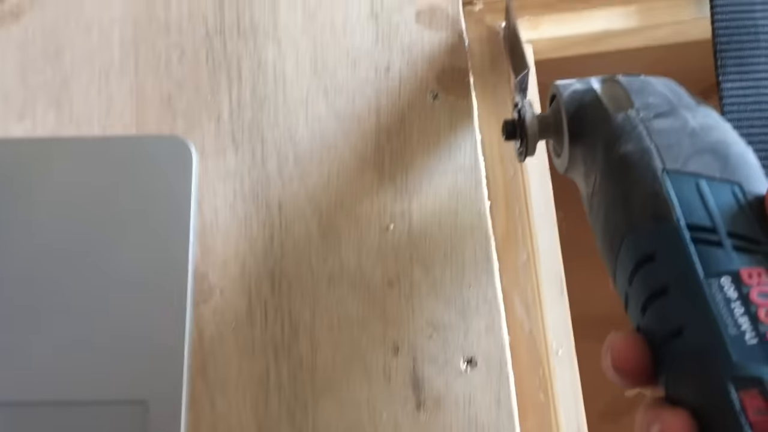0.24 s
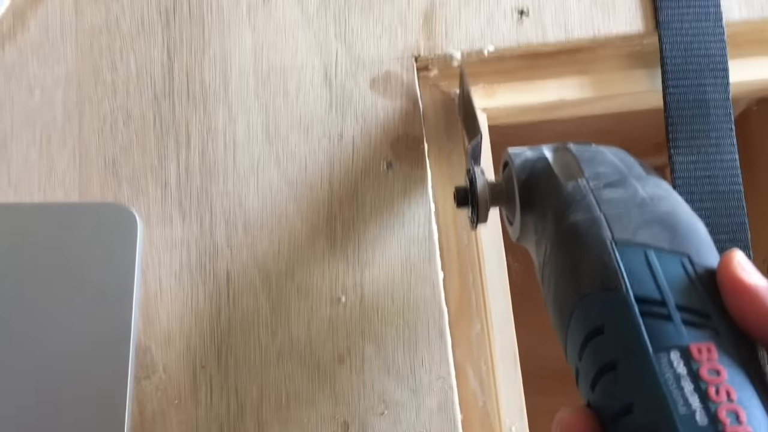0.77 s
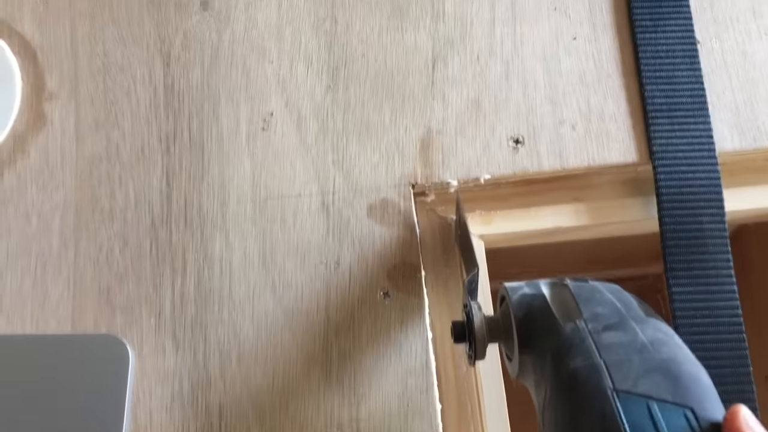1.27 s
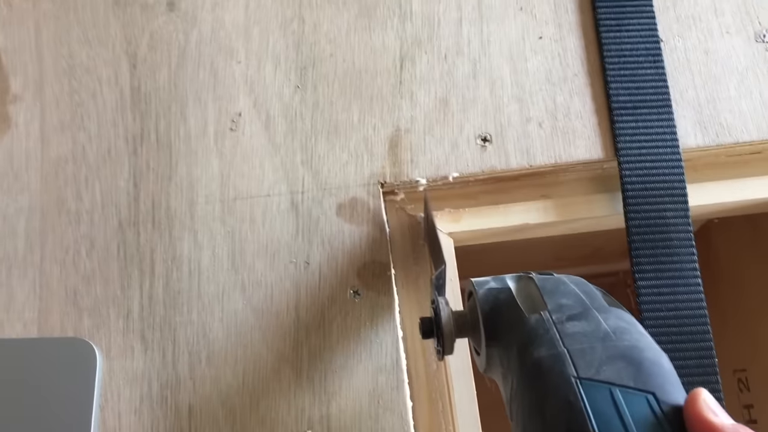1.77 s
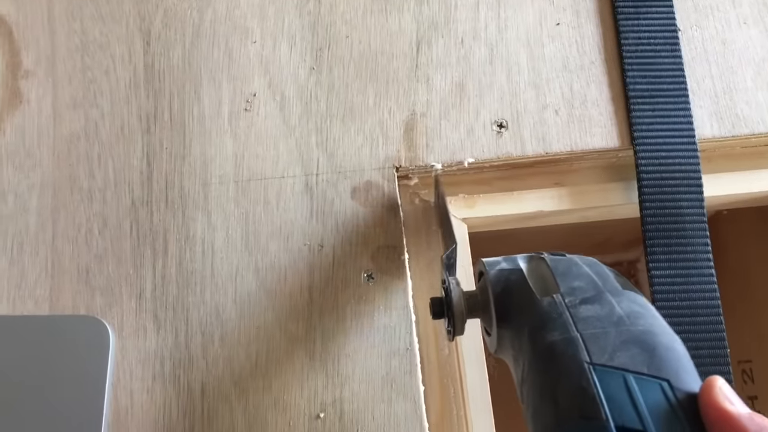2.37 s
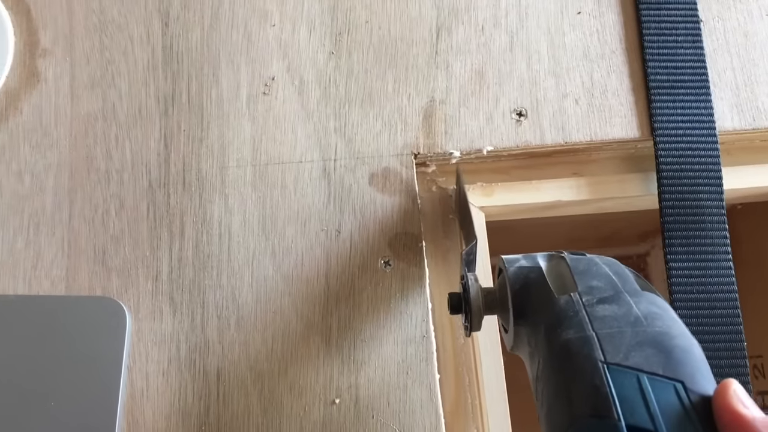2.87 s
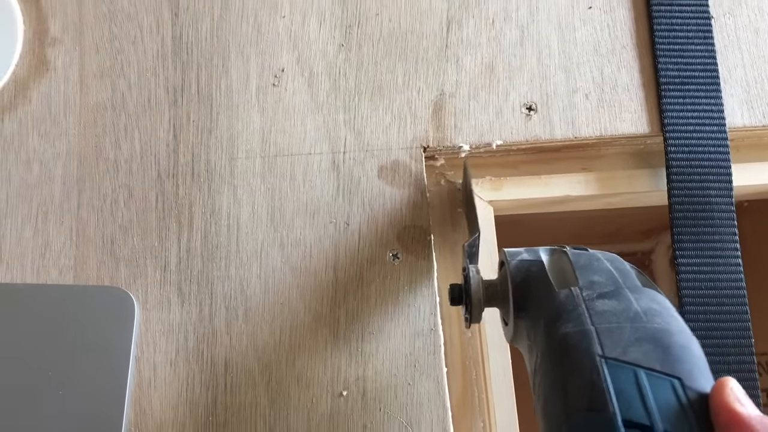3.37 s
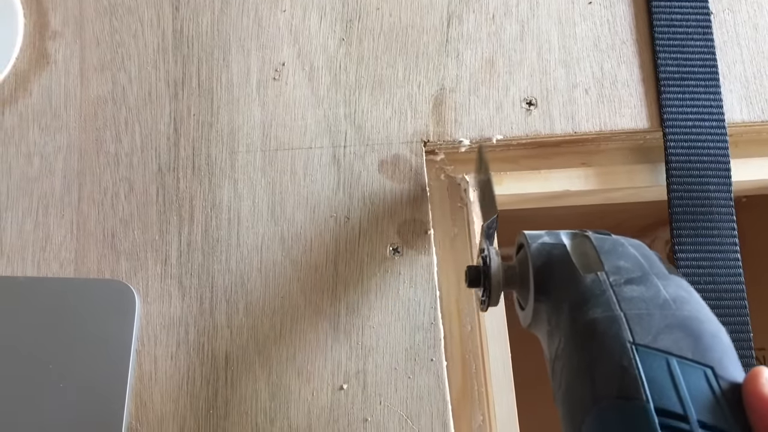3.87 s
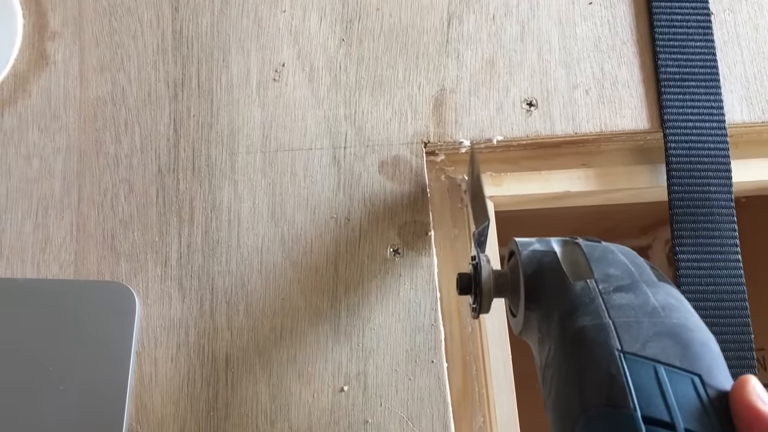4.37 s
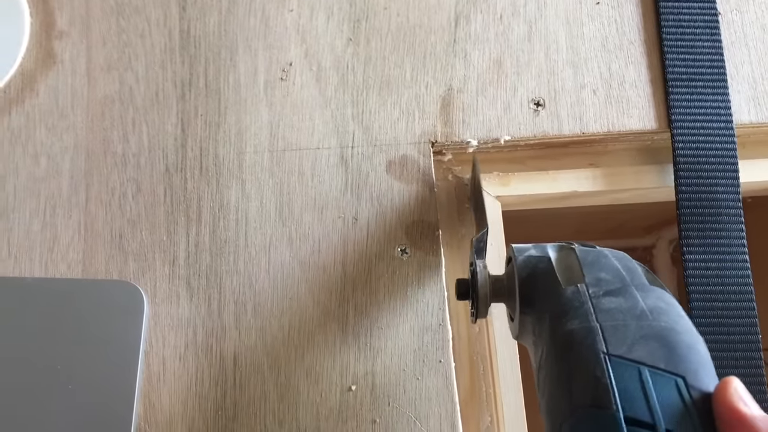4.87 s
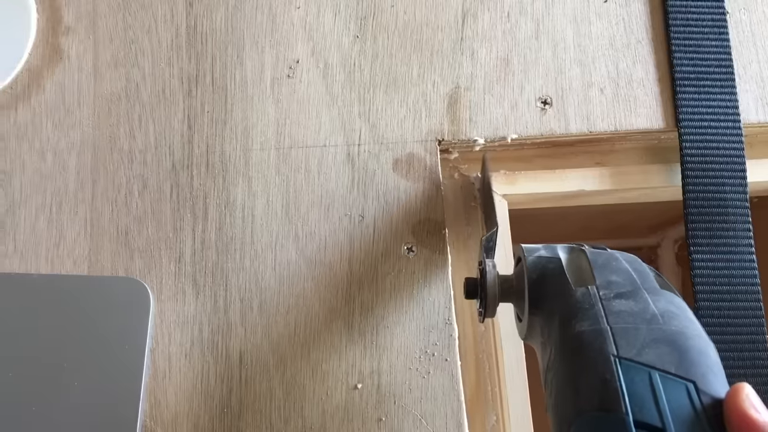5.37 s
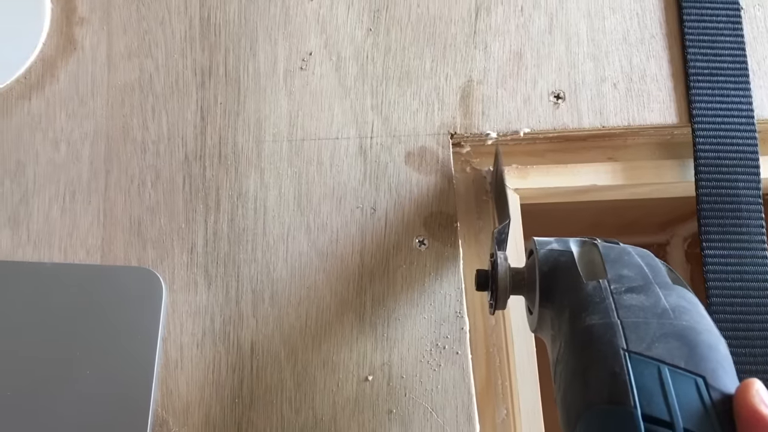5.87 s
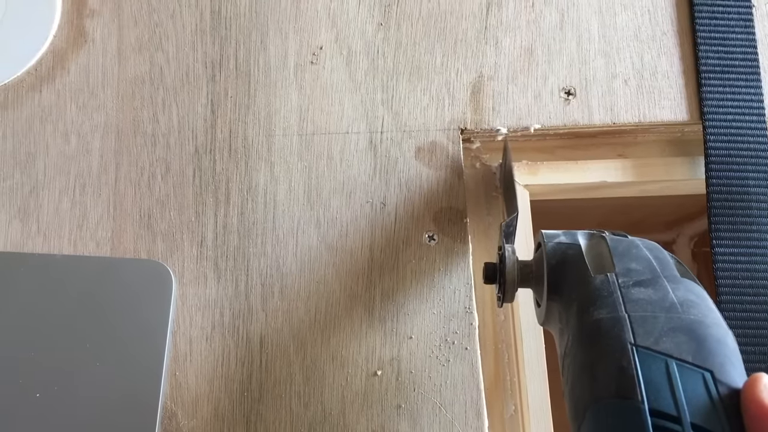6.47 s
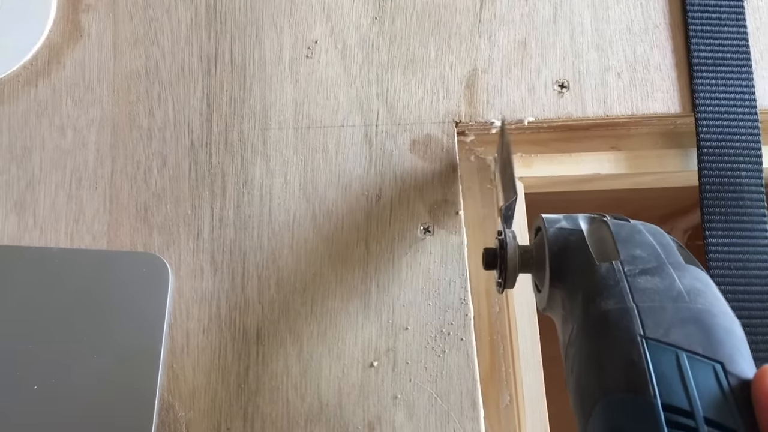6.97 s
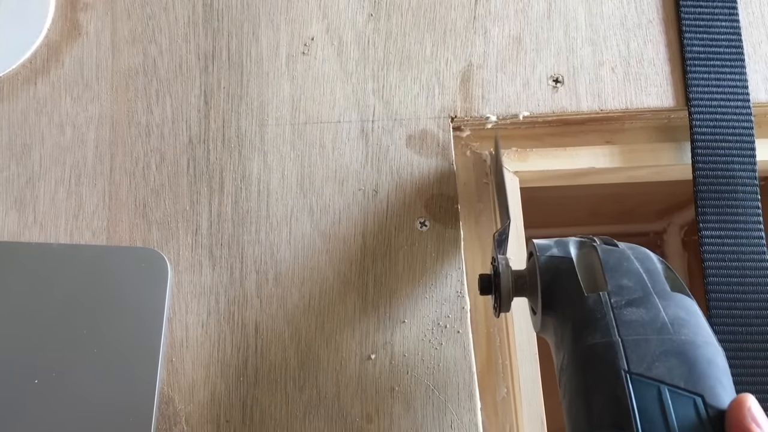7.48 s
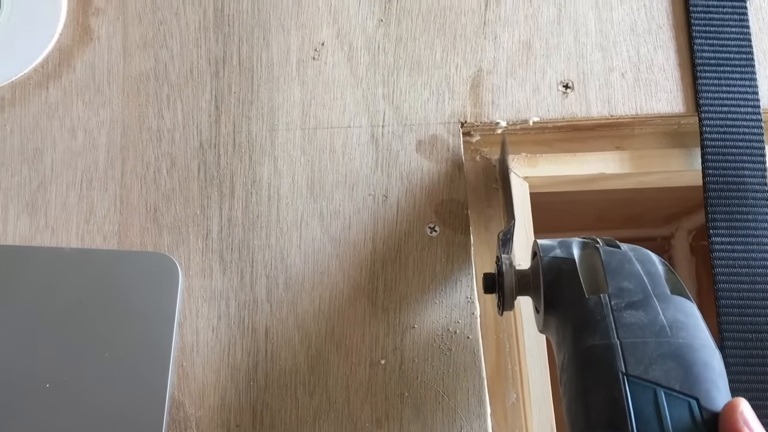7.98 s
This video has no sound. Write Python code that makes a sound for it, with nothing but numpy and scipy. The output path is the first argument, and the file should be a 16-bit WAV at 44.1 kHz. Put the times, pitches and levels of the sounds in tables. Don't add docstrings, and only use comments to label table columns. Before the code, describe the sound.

Continuous loud, nasal power-tool buzz near 285 strokes a second, with gritty wood rasp, thin metallic whine and rough knocking as the blade bounces.

```python
import sys
import numpy as np
from scipy import signal
from scipy.fft import rfft, irfft, next_fast_len
from scipy.io import wavfile
from scipy.ndimage import uniform_filter1d

SR = 44100
rng = np.random.default_rng(int(sys.argv[2]) if len(sys.argv) > 2 else 0)


def inscribe(sig):
    pcm = np.round(np.clip(np.atleast_2d(sig).T, -1, 1) * 32767)
    wavfile.write(sys.argv[1], SR, pcm.astype(np.int16))


def gain_from_decibels(decibels):
    exponent = np.asarray(decibels, float) / 20
    return 10 ** exponent


N = 363384
TIME = np.arange(N) / SR

# start t/s, end t/s, level/dB, share locked to every second stroke [0-1]
BOUNCES = [(.07, .18, -36.5, 1), (1.95, 2.3, -38, 0), (2.365, 2.385, -33, .7), (2.475, 2.562, -34.5, 1),
           (2.578, 2.598, -33, .7), (2.725, 2.795, -32.5, .75), (2.795, 2.808, -40, .75),
           (2.808, 2.84, -32.5, .75), (2.94, 2.97, -36, .3), (2.99, 3.03, -35.5, .3),
           (3.22, 3.37, -38.5, .5), (3.44, 3.49, -34, .7), (3.53, 3.56, -35, .8), (3.58, 3.62, -35, .8),
           (3.655, 3.697, -33.5, .9), (3.712, 3.762, -34, .85), (3.785, 3.828, -33.5, .8),
           (3.845, 3.887, -34, .85), (3.983, 4.0, -34, .6), (4.012, 4.09, -34, 1), (4.09, 4.168, -35.5, 1),
           (4.445, 4.475, -32.5, 1), (4.475, 4.51, -35, .8), (4.55, 4.62, -34.5, 1),
           (4.62, 4.655, -34.5, .5), (4.69, 4.73, -36, .3), (4.79, 4.86, -34.5, .3),
           (4.872, 4.928, -33.5, .8), (4.928, 4.972, -34, .2), (5.005, 5.022, -35.5, .2),
           (5.033, 5.047, -33.5, .2), (5.055, 5.095, -36.5, .2), (5.095, 5.36, -40.5, 0),
           (5.38, 5.43, -35, .2), (5.47, 5.6, -37, .2), (6.9, 6.935, -36, .3), (6.935, 7.0, -32.5, .75),
           (7.0, 7.035, -35, .6), (7.035, 7.07, -38, 0), (7.555, 7.635, -34.5, .3), (7.635, 7.8, -38, 0),
           (7.8, 7.96, -36.5, .2), (7.96, 8.06, -39, 0), (8.08, 8.17, -34, 0)]


def curves(table):
    s, *columns = np.transpose(table)
    return [np.interp(TIME, s, c) for c in columns]


def spells(table, column=2, rest=0., size=300):
    out = np.full(N, 1. * rest)
    for row in table:
        out[int(row[0] * SR):int(row[1] * SR)] = row[column]
    return uniform_filter1d(out, size=size)


def unit(x):
    return x / np.sqrt(np.mean(x ** 2))


def walk(rate):
    knots = uniform_filter1d(rng.standard_normal(int(rate * 25) + 3), size=3) * np.sqrt(3)
    return np.interp(TIME, np.arange(len(knots)) / (3 * rate), knots)


def ring(x, modes):
    total = 0
    for hz, width, db in modes:
        total = total + gain_from_decibels(db) * signal.lfilter(*signal.iirpeak(hz, hz / width, SR), x)
    return unit(total)


def gate(phase, sharp, lag=0.):
    return np.exp(sharp * (np.cos(2 * np.pi * (phase - lag)) - 1))


def shoves_db():
    shoves = [(0.027, 0.04, -6), (0.277, 0.17, -1.5), (0.484, 0.08, 3.5), (0.568, 0.029, 2),
              (0.63, 0.037, -1.5), (0.665, 0.012, 2.5), (1.407, 0.056, -1.5), (7.35, .06, -1),
              (8.131, 0.054, -0.5), (4.991, 0.023, -3), (6.94, 0.035, 1.5), (0.781, 0.098, 4.5),
              (1.11, 0.15, 1.03), (1.603, 0.27, -1), (1.995, 0.11, 3), (2.373, 0.12, -2.5),
              (2.865, 0.033, -3), (3.289, 0.12, 4), (3.632, 0.031, -2.5), (3.705, .016, -4),
              (3.771, 0.018, -4), (3.834, .018, -4), (3.905, .03, -2.5), (4.007, .014, -3),
              (1.82, .06, -1.5), (5.024, .012, -3), (6.62, .06, -1.5), (3.932, 0.059, -2),
              (4.164, 0.017, 5), (4.238, 0.082, -3), (4.465, 0.032, 3.5), (4.527, 0.022, -2.5),
              (4.727, 0.057, -1), (4.938, 0.026, 7), (4.971, 0.013, 3.5), (5.156, 0.043, -4),
              (5.392, 0.035, 2.5), (5.44, 0.03, -3), (6.699, 0.074, -3), (7.006, 0.039, 4),
              (7.11, 0.092, -2.5), (7.446, 0.14, 2), (7.591, 0.052, 1.5), (7.988, 0.03, -1.5),
              (8.201, 0.042, -2)]
    return sum(db * np.exp(-(2 * (TIME - s) / length) ** 2 / 2) for s, length, db in shoves)


def stroke_hz(locked):
    # t/s, stroke rate f/Hz
    speed = [(0, 283.8), (.3, 285.6), (.95, 280.8), (1.45, 285), (2.3, 282.6), (2.68, 289.2), (2.95, 282.8),
             (3.3, 280.9), (3.46, 287), (4.3, 286.9), (4.7, 283.8), (5.35, 285.3), (6.0, 277.5),
             (6.85, 279.2), (7.2, 289), (7.53, 288.2), (7.65, 282.3), (8.24, 280.7)]
    recover_s, brake_hz, brake_hz_per_db = .04, 5.5, .25
    keep = np.exp(-1 / (recover_s * SR))
    load_hz = brake_hz * locked + brake_hz_per_db * shoves_db()
    return curves(speed)[0] - signal.lfilter([1 - keep], [1, -keep], load_hz) + .45 * walk(9.)


def wobble(repeat):
    sways = [
        (.3, .9, .1),
        (1.5, 2.4, .24),
        (5.33, 5.95, .27),
        (6.75, 6.92, .25),
        (7.78, 8.3, .22),
    ]
    depth = spells(sways, rest=.06, size=4000) * np.minimum(2.5 - 2.5 * repeat, 1.2)
    wobble_hz = 36.77 + 4 * walk(5.)
    return depth * np.exp(2j * np.pi * np.cumsum(wobble_hz) / SR)


def hum(phase, hum_db, locked, repeat, sway):
    level_db = hum_db - 2.5 * locked + 3.6 * (1 - repeat) * walk(14.)
    return np.sqrt(2) * np.cos(2 * np.pi * phase) * (1 + .6 * sway.real) * gain_from_decibels(level_db)


def favour(multiple):
    # start t/s, end t/s, multiple of the stroke rate, level/dB
    favoured = [(.36, 1.2, 12, 7), (.66, 1.45, 11, 4), (.5, 1.3, 15, 8), (.66, 1.45, 10, -4),
                (1.0, 1.3, 9, 3), (1.3, 1.5, 5, -7), (1.9, 2.1, 5, -4), (1.95, 2.3, 7, -5),
                (2.62, 2.7, 12, 6), (3.22, 3.37, 5, 4), (3.22, 3.37, 6, -8), (3.22, 3.32, 8, 8),
                (1.9, 2.3, 12, 5), (3.2, 3.45, 12, 6), (2.62, 2.7, 13, 5), (4.33, 4.41, 13, 7),
                (4.33, 4.41, 20, 8), (4.33, 4.41, 11, -4), (5.25, 5.4, 9, -9), (5.25, 5.4, 6, -5),
                (5.25, 5.4, 7, -4), (5.62, 5.78, 9, 3), (5.62, 5.78, 6, -6), (5.93, 6.09, 6, 5),
                (5.99, 6.09, 8, 7), (6.0, 6.1, 7, -3), (7.08, 7.36, 6, 3), (6.1, 6.2, 5, -7),
                (6.1, 6.2, 6, -4), (6.33, 6.6, 13, -6), (6.33, 6.6, 16, -6), (6.35, 6.56, 6, 3),
                (6.3, 6.5, 3, 5), (6.5, 6.8, 5, -4), (6.12, 6.6, 7, 3), (6.34, 6.47, 9, -10),
                (6.3, 6.6, 20, -6), (6.62, 6.78, 14, 7), (6.62, 6.78, 12, 6), (6.78, 6.92, 6, 6),
                (6.9, 7.05, 7, -6), (6.9, 7.05, 5, 4), (7.06, 7.16, 7, 3), (7.15, 7.25, 8, -10),
                (7.15, 7.25, 12, -10), (7.15, 7.25, 11, 4), (7.15, 7.25, 14, 7), (7.15, 7.25, 15, 6),
                (7.55, 7.65, 6, 6), (7.55, 7.8, 7, -5)]
    # start t/s, end t/s, level/dB
    whistles = [(0, .07, 10), (.07, .18, 1.5), (.18, .36, 5.5), (.36, .47, 4), (.47, .66, 2.5),
                (2.3, 2.47, 4), (2.6, 2.72, 3.5), (3.0, 3.22, 3.5), (4.21, 4.33, 5.5), (4.33, 4.44, 2.5),
                (2.475, 2.6, 0.5), (2.73, 2.84, -3), (4.0, 4.18, 0), (4.45, 4.51, -2), (4.51, 4.55, 5),
                (4.55, 4.66, 0), (3.89, 3.98, 4), (5.5, 5.9, 0)]
    rows = [row for row in favoured if row[2] == multiple]
    near_whistle = 5 <= multiple <= 13
    if not rows and not near_whistle:
        return 1
    db = spells(rows, column=3, size=1100)
    if near_whistle:
        db = db + spells(whistles, size=700) * (1 if multiple == 7 else -.9)
        db = np.minimum(db, 9)
    return gain_from_decibels(db)


def buzz(phase, buzz_db, housing_db, rough, wedged, skimming):
    # multiple of the stroke rate, level/dB
    biting_tones = [(1, -11), (2, -7), (3, -7), (4, -8), (5, 2.5), (6, 5), (7, 6.5), (8, -3.5), (9, 3),
                    (10, -1.5), (11, -3), (12, -3), (13, -4.5), (14, -7), (15, -9.5), (16, -9), (17, -14.5),
                    (18, -16), (19, -6.5), (20, -1.5), (21, -8), (22, -19.5)]
    # multiple of the stroke rate, level/dB
    wedged_tones = [(1, -5), (2, -11), (3, -12), (4, -13), (5, -13), (6, -7), (7, 0), (8, -7), (9, -8),
                    (10, -13), (11, -12), (12, -9), (13, -3), (14, -6), (15, -16), (16, -6), (17, -20),
                    (18, -19), (19, -11), (20, -10), (21, -16), (22, -17)]
    # multiple of the stroke rate, level/dB
    skimming_tones = [(1, -12), (2, -10), (3, -18), (4, -8), (5, -10), (6, -2), (7, -4), (8, 0), (9, -8),
                      (10, -10), (11, -8), (12, -10), (13, -7), (14, -15), (15, -14), (16, -15), (17, -22),
                      (18, -21), (19, -11), (20, -21), (21, -11), (22, -21)]
    # multiple of the stroke rate, spread [multiples], level/dB
    blade_peaks = [(29.1, 1.5, 7), (40.3, .9, 6), (45, 1.6, 10), (51, 1.5, 11)]
    biting = np.maximum(1 - wedged - skimming, 0)
    db = np.array([biting_tones, wedged_tones, skimming_tones])[:, :, 1]
    tail = db[:, -1:] - 0.2962 * np.arange(1, 31) + 1.2 * rng.standard_normal((3, 30))
    tail = tail + np.array([[0.], [-4.], [0.]])
    for multiple, spread, lift_db in blade_peaks:
        tail = tail + lift_db * np.exp(-((np.arange(23, 53) - multiple) / spread) ** 2)
    gains = gain_from_decibels(np.hstack([db, tail]))
    gains = gains / np.sqrt(np.sum(gains[:, 4:17] ** 2, axis=1, keepdims=True) / 2)
    creep = .15
    turn = np.exp(2j * np.pi * (phase + .006 * rough * walk(45.)))
    housing = gain_from_decibels(housing_db + 12.5 + 2.45 * rough * walk(24.))
    blade = gain_from_decibels(buzz_db + 2.2 * rough * walk(22.))
    tone, low, high = turn, 0, 0
    for multiple in range(2, gains.shape[1] + 1):
        tone = tone * turn
        bite_gain, wedge_gain, skim_gain = gains[:, multiple - 1]
        size = bite_gain * biting + wedge_gain * wedged + skim_gain * skimming
        size = size * favour(multiple)
        start = 2 * np.pi * rng.random()
        across = tone.real * (np.cos(start) + creep * walk(6.))
        along = tone.imag * (np.sin(start) + creep * walk(6.))
        part = size * (across + along)
        if multiple <= 4:
            low = low + part
        else:
            high = high + part
    return housing * low + blade * high


def rasp(phase, rasp_db, bright_db, coupling_db):
    # f/Hz, level/dB (per Hz)
    colour = [(40, -83), (130, -23), (380, -16), (600, -3), (780, -12.5), (1300, -5.5), (2000, 3.5),
              (2900, -4.5), (3600, -4.5), (5000, -9.5), (7000, -15.5), (9000, -17.5), (10600, -18),
              (12500, -19), (14000, -18.5), (15700, -21)]
    # f/Hz, width f/Hz, level/dB
    timber = [(1444, 16, -2), (1630, 63, -6), (2260, 200, -4), (2510, 77, -2), (3410, 41, -7.5),
              (3120, 190, -9)]
    usual_db, treble_share = -19.5, 0.28
    puffs = gate(phase, 0.37) + 0.57 * gate(phase, 6.9, lag=0.4) + 0.25
    grit = rng.standard_normal(N) * puffs * gain_from_decibels(1.53 * walk(150.) + .4 * walk(18.))
    size = next_fast_len(N)
    tear = rfft(grit, size)
    octave = np.log2(np.maximum(np.arange(len(tear)) * SR / size, 20))
    colour_hz, colour_db = np.transpose(colour)
    tear = tear * gain_from_decibels(np.interp(octave, np.log2(colour_hz), colour_db))
    tear = tear / np.std(irfft(tear, size))
    out = 0
    for mode in timber:
        out = out + ring(grit, [mode]) * gain_from_decibels(mode[2] + 3.9 * walk(18.0))
    out = out * gain_from_decibels(rasp_db - 12.5)
    out = out + ring(grit, [(1990, 110, 0)]) * gain_from_decibels(np.interp(TIME, [.38, .5], [-31, -45]))
    for centre in np.arange(5.5, 14.5, .5):
        share = np.interp(centre, [11.4, 12.5], [1, treble_share])
        flicker_db = 1.2 * walk(14.) + bright_db * np.exp(-(centre - 11.7) ** 2 / .3)
        flicker_db = flicker_db + coupling_db * (centre < 9.6)
        band = irfft(tear * np.clip(1 - 2 * abs(octave - centre), 0, 1), size)[:N]
        out = out + band * gain_from_decibels(usual_db + share * (rasp_db - usual_db) + flicker_db)
    return out


def steel(phase, ring_db):
    # f/Hz, width f/Hz, level/dB
    low_modes = [(5724, 39, 13.5), (4240, 27, 7), (5840, 430, -7), (8050, 65, -5), (8340, 64, 2),
                 (9660, 50, -4.5), (11230, 120, -16), (15600, 290, -22), (12000, 250, -21)]
    # f/Hz, width f/Hz, level/dB
    upper_modes = [(11160, 65, 4), (8450, 90, 0), (12520, 50, 1), (9910, 70, -5), (7190, 60, -6),
                   (13130, 80, -8), (15200, 120, -10), (11600, 150, -8)]
    # start t/s, end t/s, level/dB
    loose = [
        (.66, .92, 3),
        (1.0, 1.5, 3.5),
        (2.25, 2.45, -0.5),
    ]
    # start t/s, end t/s, level/dB over their rest
    singing = [
        (2.8, 2.86, 13),
        (2.86, 3.42, 7.5),
        (3.42, 3.6, 12.5),
        (4.68, 5.05, 12),
        (5.05, 5.34, 15),
        (5.34, 5.6, 5),
        (6.94, 7.07, 13),
        (7.57, 7.62, 13),
        (7.62, 7.74, 17),
        (7.75, 8.3, 8),
    ]
    shake = rng.standard_normal((2, N)) * (gate(phase, 0.39) + .5)
    low = ring(shake[0] * gain_from_decibels(3 * walk(26.)), low_modes)
    upper = ring(shake[1] * gain_from_decibels(3.2 * walk(18.)), upper_modes)
    low_db = ring_db + 6.0 + spells(loose, size=1500)
    upper_db = -42.5 + spells(singing, size=1500)
    return low * gain_from_decibels(low_db) + upper * gain_from_decibels(upper_db)


def garage():
    # t/s, rumble level/dB
    rumble_db = [
        (0, -64),
        (4.9, -69),
        (5.3, -59.5),
        (7.1, -63),
        (8.24, -63),
    ]
    rumble = ring(ring(rng.standard_normal(N), [(57.36, 93.0, -4)]), [(60, 150, 0)])
    return gain_from_decibels(curves(rumble_db)[0]) * rumble


def chatter(phase, held):
    # f/Hz, width f/Hz, level/dB
    knock_modes = [(1280, 100, 7.5), (1540, 100, 7), (1700, 70, 6.5), (2530, 70, 14), (2670, 60, 11.5),
                   (980, 100, 0), (1130, 120, 1), (1830, 150, 0), (3700, 700, -12)]
    mode_lag_s, rebound = .0011, .25
    strokes = np.arange(1, int(phase[-1]) - 1)
    chance = rng.standard_normal((len(strokes), 2)).T
    s = np.interp(strokes, phase, TIME)
    locked = np.interp(s, TIME, held)
    slack = np.maximum(1 - 1.05 * locked, .1)
    when = np.searchsorted(phase, strokes + .2 + .07 * slack * chance[0])
    blows = np.zeros(N)
    blows[when] = np.where(strokes % 2, 1, rebound) * gain_from_decibels(7 * locked + 8.0 * slack * chance[1])
    knock = 0
    for k, mode in enumerate(knock_modes):
        mode_db = mode[2] + 10 * np.log10(mode[1]) + 2 * walk(14.)
        knock = knock + np.roll(ring(blows, [mode]), int(k * mode_lag_s * SR)) * gain_from_decibels(mode_db)
    knock = ring(unit(knock), [(2200, 2600, 0)])
    spray = rng.standard_normal(N) * (gate(phase / 2, 0.45, lag=0.79) + 1.7 * gate(phase, 1.1, lag=0.62))
    sizzle = ring(spray, [(9600, 750, 7.5), (11900, 1300, 1), (14900, 900, -2), (6300, 2100, -6)])
    bounce_db = spells(BOUNCES, rest=-41.5)
    bounce_db = bounce_db + .9 * np.minimum(bounce_db + 36, 0)
    return (knock * gain_from_decibels(8.5 + 6 * held) + sizzle * gain_from_decibels(4.0 + 2 * held)) * gain_from_decibels(bounce_db)


def bumps():
    # t/s, level/dB, f/Hz
    thuds = [(.17, -46, 178), (2.932, -48, 190), (3.302, -43, 149.4), (5.23, -34, 540.6),
             (5.484, -32, 518.3), (4.935, -38, 250), (3.52, -42, 188.2), (4.155, -34, 480),
             (4.17, -48, 130), (4.931, -39, 545), (5.402, -42, 204.7), (6.791, -34, 255.6),
             (6.861, -43, 232.7), (7.05, -54, 55), (7.851, -46, 201)]
    t60, attack_s = 0.16, 0.0056
    out, t = np.zeros(N), np.arange(int(.2 * SR)) / SR
    fade = np.exp(-np.log(1000) * t / t60) * np.minimum(t / attack_s, 1)
    for s, db, hz in thuds:
        thud = ring(rng.standard_normal(len(t)), [(hz, hz * 0.059, 0)]) * fade
        out[int(s * SR):int(s * SR) + len(t)] += gain_from_decibels(db + 5) * thud
    return out


def shudder():
    shakes = [
        (.8, 1.12, 7.7),
        (1.5, 2.4, 9.9),
        (2.88, 2.99, 16.5),
        (3.2, 3.9, 10.1),
        (3.95, 4.95, 3.8),
        (5.1, 5.7, 6.1),
        (7.6, 8.3, 10.5),
    ]
    shaking = ring(ring(rng.standard_normal(N), [(133, 23, -5), (233, 113, 9)]), [(171, 700, 0)])
    return gain_from_decibels(-60.5 + spells(shakes, size=3000)) * shaking


def scene():
    # t/s, level/dB
    pressure = [(0, -37.5), (.4, -32), (.6, -37), (.95, -31.5), (1.08, -35.5), (1.4, -38.5), (1.8, -37.5),
                (2.7, -36), (3.03, -33.5), (3.3, -28), (3.46, -36), (4.6, -36.5), (4.86, -29), (4.9, -40),
                (4.95, -30), (5.0, -39), (5.15, -39), (5.22, -33.5), (5.45, -32), (6.05, -28.5),
                (6.48, -29), (6.85, -35.5), (8.24, -32.5)]
    # t/s, level/dB of its low overtones
    grip = [(0, -33), (.6, -31.5), (1.0, -38.5), (2.0, -35), (2.3, -33), (4.85, -30.5), (5.0, -39),
            (5.25, -33), (5.55, -38), (5.75, -31), (7.7, -30), (8.15, -39.5), (8.24, -30.5)]
    # start t/s, end t/s, repeating share of the power [0-1]
    grooved = [(0, .06, 0.54), (.18, .36, 0.57), (.36, .46, 0.81), (.46, .65, 0.49), (.65, 1.0, 0.63),
               (1.0, 1.4, 0.75), (1.4, 1.47, 0.53), (1.47, 1.62, 0.26), (1.9, 2.08, 0.74), (2.08, 2.3, 0.4),
               (2.39, 2.47, 0.53), (2.6, 2.64, 0.99), (2.64, 2.69, 0.9), (2.69, 2.72, 0.76),
               (2.95, 3.1, 0.2), (3.1, 3.2, 0.45), (3.2, 3.38, 0.68), (3.38, 3.45, 0.32),
               (4.19, 4.25, 0.63), (4.25, 4.33, 0.42), (4.41, 4.445, 0.4), (1.62, 1.9, .45),
               (4.33, 4.41, 0.94), (4.51, 4.55, 0.5), (5.3, 5.37, 0.76), (5.62, 5.75, 0.66),
               (5.85, 5.95, 0.63), (5.95, 6.0, 0.81), (6.0, 6.33, 0.96), (6.33, 6.4, 0.77), (6.4, 6.6, 0.8),
               (6.6, 6.9, 0.46), (7.07, 7.13, .75), (7.155, 7.245, .97), (7.27, 7.32, 0.78),
               (7.32, 7.385, 0.49), (7.385, 7.525, 1), (7.56, 7.63, 0.74), (8.17, 8.3, 0.68)]
    # start t/s, end t/s, share [0-1]
    skims = [
        (.25, .45, 0.14),
        (2.6, 2.8, 0.34),
        (4.33, 4.42, 0.55),
        (7.06, 7.36, 0.93),
        (7.36, 7.56, 0.88),
    ]
    wedges_from_db, wedges_over_db = -34, 6

    locked = np.clip(spells(BOUNCES, column=3), 0, 1)
    hz, hum_db = stroke_hz(locked), curves(pressure)[0]
    housing_db = curves(grip)[0] + 4.9 * locked

    repeat = np.maximum(spells(grooved, rest=0.26), .55 * locked).clip(.02, .99)
    cut_db = -20.5 + shoves_db()
    buzz_db = cut_db + 10 * np.log10(repeat)
    rasp_db = cut_db + 10 * np.log10(1 - repeat) - 13 * locked
    rough = np.clip((rasp_db - buzz_db + 10.5) / 10, 0, 1)

    wedged = np.clip((hum_db - wedges_from_db) / wedges_over_db, 0, 1)
    wedged = wedged * (1 - locked) * np.clip(2.4 * repeat - 1.1, .2, 1)
    skimming = np.clip(spells(skims, size=1500), 0, 1 - wedged)

    sway = wobble(repeat)
    steady = np.cumsum(hz) / SR
    phase = steady - .04 * sway.imag

    ring_db = -36 - 0.36 * (housing_db + 33.5) - 0.69 * np.maximum(hum_db - wedges_from_db, 0)
    ring_db = ring_db + 4 * np.log10(1 - repeat) + 1

    mono = hum(phase, hum_db, locked, repeat, sway)
    mono = mono + buzz(phase, buzz_db, housing_db, rough, wedged, skimming) * (1 + 0.88 * sway.real)
    torn = rasp(steady, rasp_db, .5 * shoves_db(), 0.26 * (housing_db + 18.5))
    mono = mono + torn * (1 + 0.43 * sway.real)
    mono = mono + steel(steady, ring_db) + garage()
    mono = mono + chatter(steady, locked) + bumps() + shudder()
    return np.array([mono, mono])


def band_limit(x):
    return signal.sosfilt(signal.butter(12, 16710, fs=SR, output="sos"), x)


def record(dry):
    # f/Hz, width f/Hz, share taken out [0-1]
    port_dips = [(10430, 320, 0.41), (14100, 2000, 0.32)]
    bass = signal.butter(2, 48, "high", fs=SR, output="sos")
    top = signal.ellip(12, .3, 60, 15730, fs=SR, output="sos")
    for hz, width, share in port_dips:
        dry = dry - share * signal.lfilter(*signal.iirpeak(hz, hz / width, SR), dry)
    rounded = np.tanh(1.297 * dry) / 1.5
    mix = signal.sosfilt(np.vstack([bass, top]), rounded)
    return band_limit(mix)


dry = scene()
out = record(dry)
inscribe(out)
```